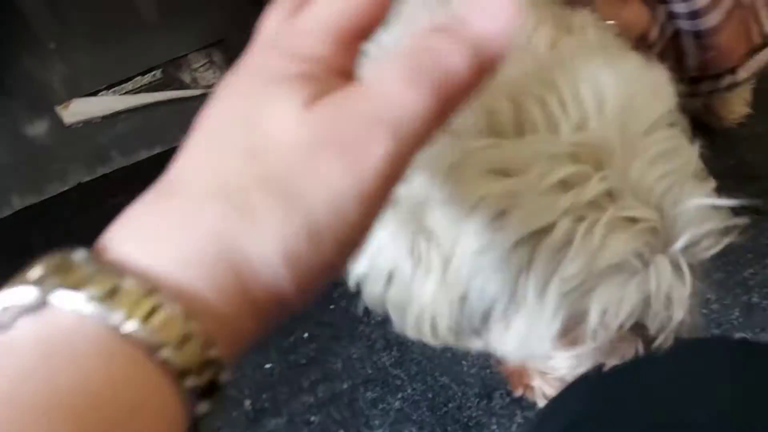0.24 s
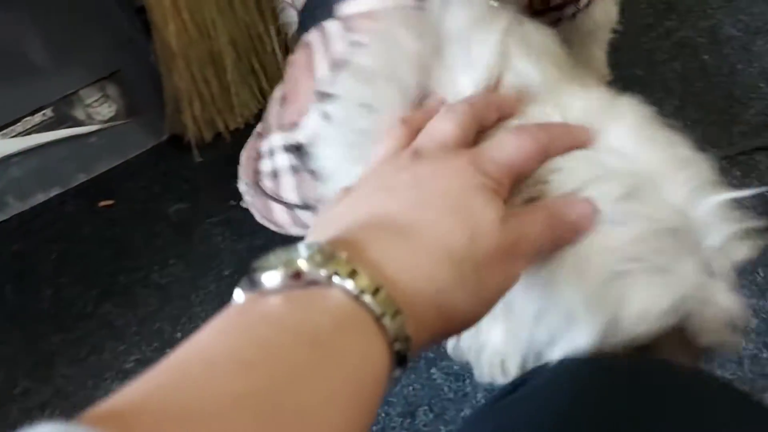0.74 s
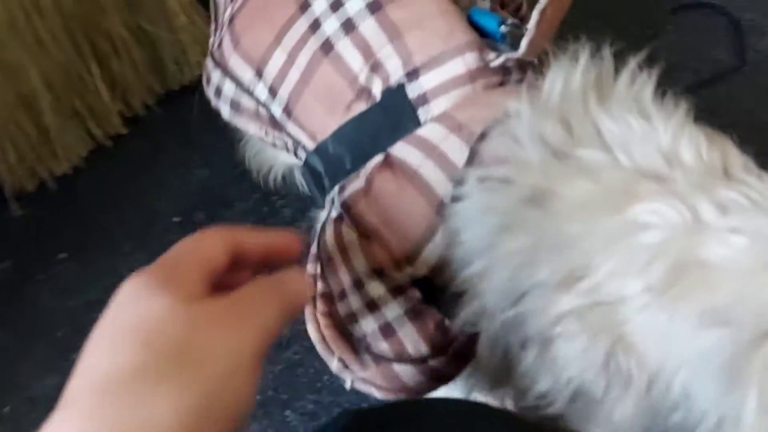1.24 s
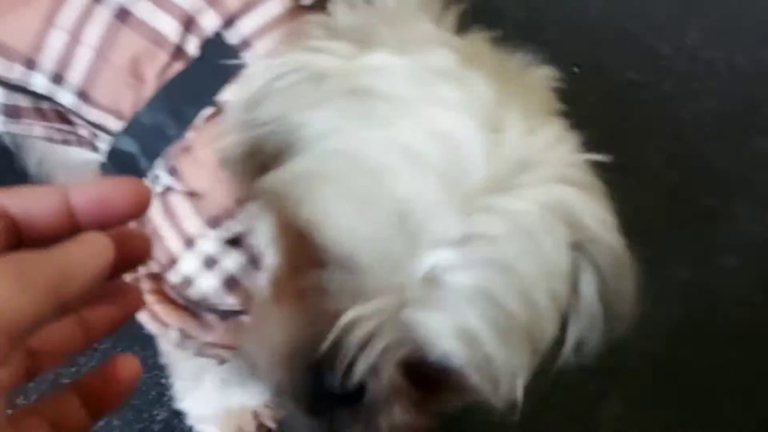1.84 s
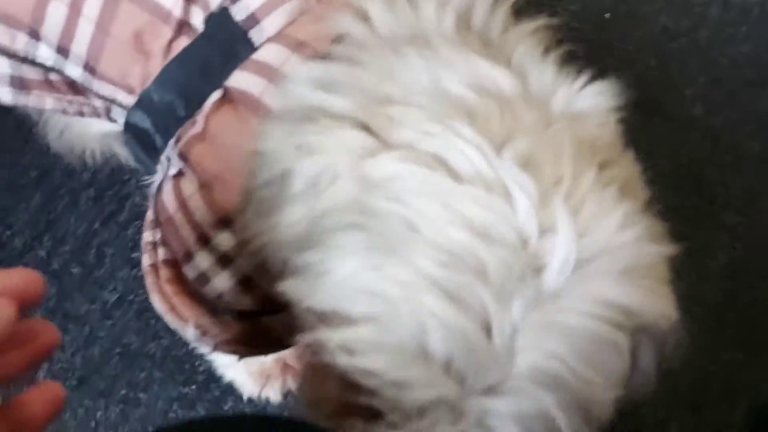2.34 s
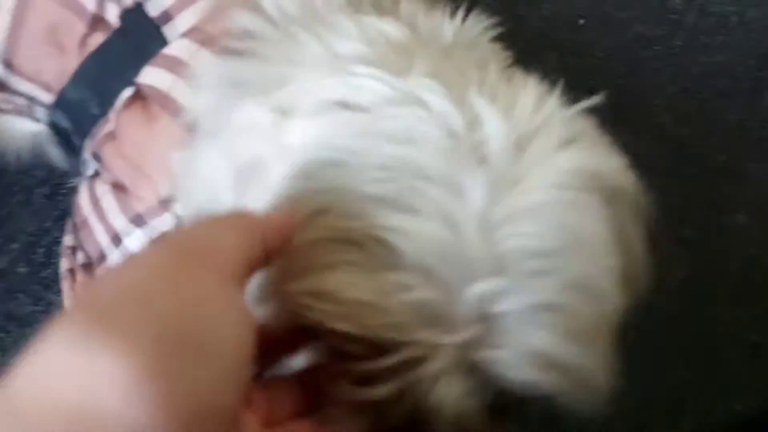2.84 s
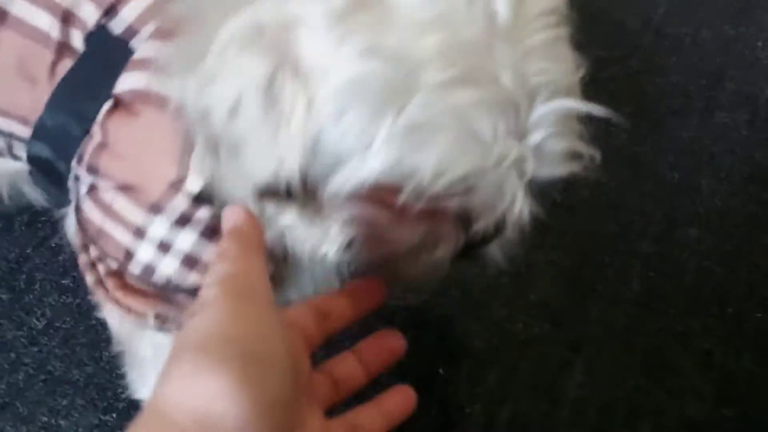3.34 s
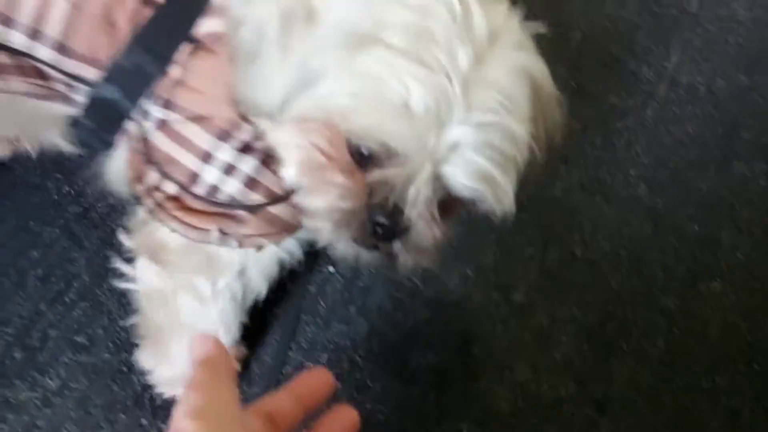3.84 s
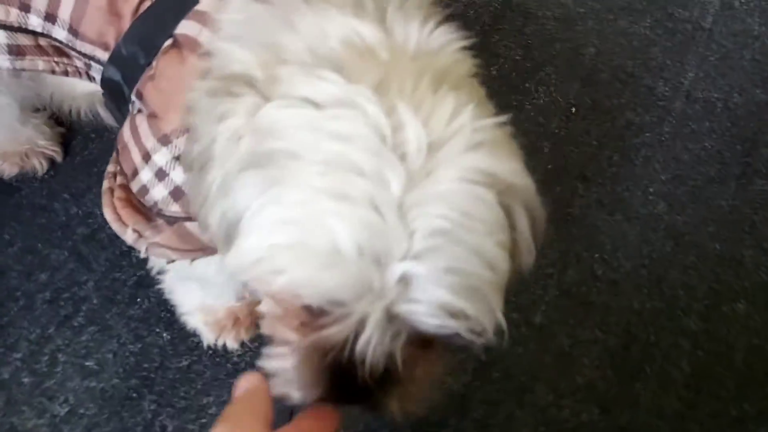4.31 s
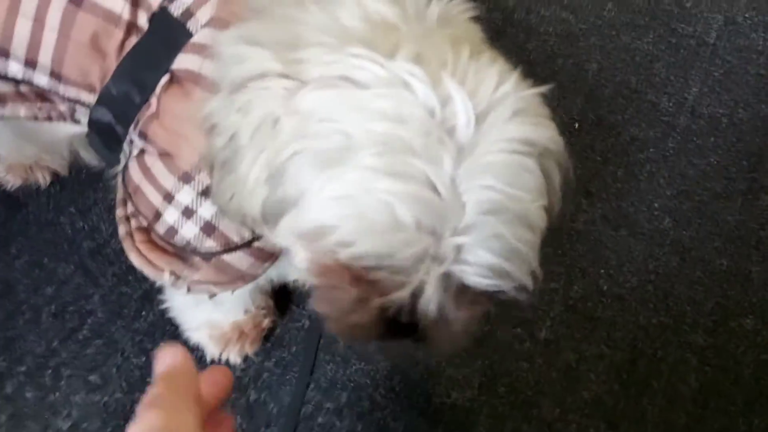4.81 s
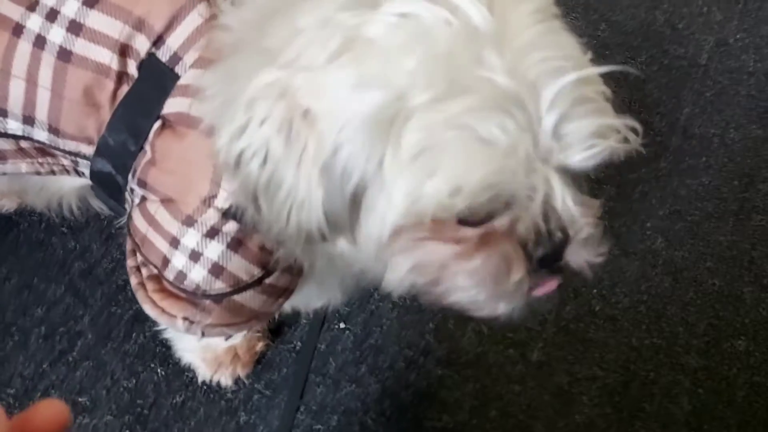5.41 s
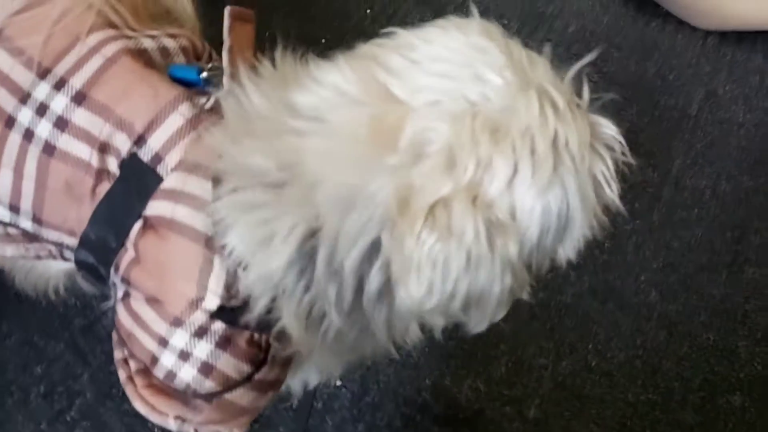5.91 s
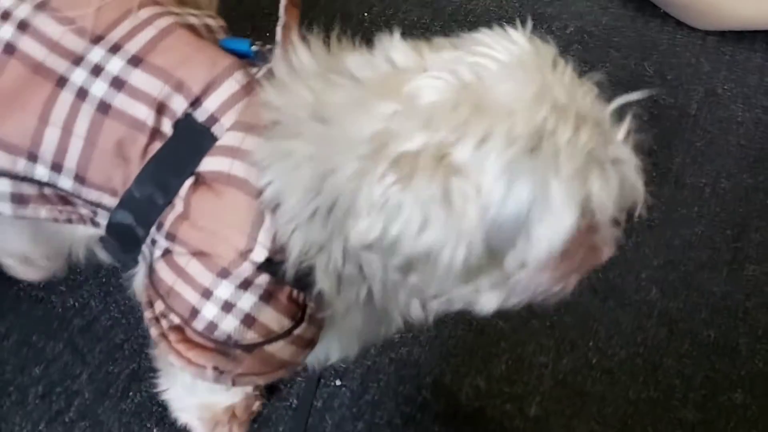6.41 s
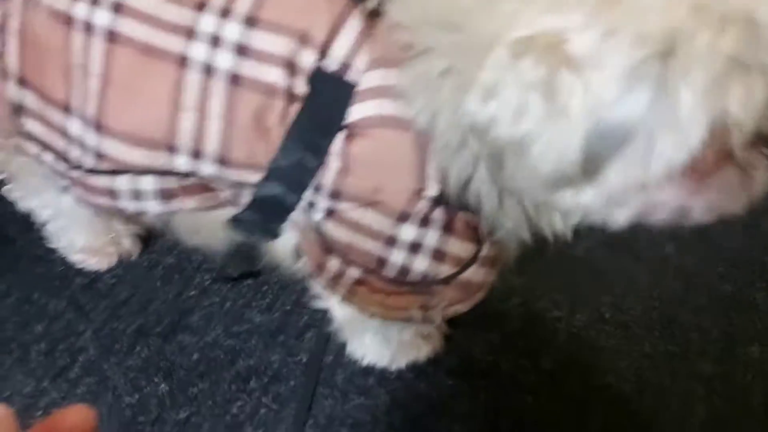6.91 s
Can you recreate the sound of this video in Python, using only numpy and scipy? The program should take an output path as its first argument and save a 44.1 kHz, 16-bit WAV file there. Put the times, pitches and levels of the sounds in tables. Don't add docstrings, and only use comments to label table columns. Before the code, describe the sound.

Over a low electrical hum and airy ventilation, collar pieces clink and rattle, a dog sniffs close by, and something soft thuds and bounces.

```python
import sys
import numpy as np
from scipy import signal
from scipy.fft import rfft, irfft, next_fast_len
from scipy.io import wavfile
from scipy.ndimage import uniform_filter1d

SR = 44100
rng = np.random.default_rng(int(sys.argv[2]) if len(sys.argv) > 2 else 0)


def voltage_ratio(decibels):
    exponent = np.asarray(decibels, float) / 20
    return 10 ** exponent


def dump_mix(stems):
    frames = np.atleast_2d(stems).T
    limited = np.clip(frames, -1, 1)
    pcm = np.round(limited * 32767).astype(np.int16)
    wavfile.write(sys.argv[1], SR, pcm)


N = 315476
M = next_fast_len(N)
T = np.arange(N) / SR
F = np.log(np.fft.rfftfreq(M, 1 / SR) + 1)
PORT_LAG = 18


def on_hz(table, column=1):
    points = np.array(table)
    return np.interp(F, np.log(points[:, 0]), points[:, column])


def colour(x, table):
    return irfft(rfft(x, M) * voltage_ratio(on_hz(table)), M)[..., :N]


def unit(x):
    return x / np.sqrt(np.mean(x ** 2))


def curve(rows, column=1, off=None):
    points = np.array(rows)
    return np.interp(T, points[:, 0], points[:, column], off, off)


def walk(rate):
    hold = int(SR / rate)
    steps = np.repeat(rng.standard_normal(N // 500), hold)[:N]
    return uniform_filter1d(uniform_filter1d(steps, hold), hold)


def resonate(x, hz, width):
    r = np.exp(-np.pi * width / SR)
    return signal.lfilter([1 - r, 0, r - 1], [1, -2 * r * np.cos(2 * np.pi * hz / SR), r * r], x)


def add(out, s, db, hz, t60, rise_s=1e-5, damp_s=9):
    i = int(s * SR)
    t = T[:min(int(t60 * SR), N - i)]
    decay = 1000 ** (-t / t60 - np.maximum(t - damp_s, 0) / 0.041)
    shape = (1 - np.exp(-t / rise_s)) * decay
    out[..., i:i + len(t)] += np.multiply.outer(voltage_ratio(db), np.sin(2 * np.pi * hz * t) * shape)


def bands(x, centres_hz, gains):
    size = next_fast_len(x.shape[-1], True)
    spectrum = rfft(x, size)
    log_hz = np.log(np.fft.rfftfreq(size, 1 / SR) + 1)
    out = 0
    for row, gain in zip(np.eye(len(centres_hz)), gains):
        share = np.interp(log_hz, np.log(centres_hz), row)
        out = out + irfft(spectrum * share, size)[..., :len(gain)] * gain
    return out


# freq_hz, t60_s, port_likeness (1 = same at both)
ROOM = [(59.5, 0.42, .995), (149, 1.1, 0.74), (310, 0.85, 0.98), (620, 0.68, 0.14), (1420, 0.65, -.1),
        (3000, 0.58, 0.16), (6900, 0.37, 0.02), (14000, 0.17, 0)]


def pair():
    like = np.clip(on_hz(ROOM, column=2), -1, 1)
    mid, side = rfft(rng.standard_normal((2, M)))
    opposite = np.array([[1], [-1]])
    both = np.sqrt((1 + like) / 2) * mid + np.sqrt((1 - like) / 2) * side * opposite
    return irfft(both, M)[:, :N]


def room(x, direct_db, wet_db, build_s=0.011, lag=PORT_LAG):
    t = T[:SR]
    fades = [1000 ** (-t / t60) * np.sqrt(2 * np.log(1000) / t60 / SR) for _, t60, _ in ROOM]
    tail = bands(pair()[:, :2 ** 16], np.array(ROOM)[:, 0], fades) * (1 - np.exp(-t / build_s))
    direct = np.array([np.roll(x, int(lag)), x])
    reflections = signal.fftconvolve(x[None], tail, axes=1)[:, :N]
    return voltage_ratio(direct_db) * direct + voltage_ratio(wet_db) * reflections


# time_s, level_db
HUM_LOAD = [
    (0.0, -30.5),
    (1.51, -27.5),
    (2.01, -25.5),
    (2.69, -26.5),
    (3.19, -25),
    (4.6, -26),
    (6.29, -25.5),
    (7.15, -26.5),
]
# centre_s, half_length_s, lift_db
BRUSHES = [
    (.1, .5, -3),
    (1.0, .3, 1),
    (3.07, .3, 7),
    (4.2, .3, 1.5),
    (4.75, .2, -2),
    (5.3, .3, 3.5),
    (6.18, .1, -4),
    (6.45, .2, 2),
    (6.72, .1, -3),
    (7.15, .3, 2),
]
# freq_hz, width_hz, level_db
DUCTS = [(179.2, 15.7, 2), (242, 14, -6), (268.5, 25, -5.5), (302, 15, -2.5), (350.7, 18, -8.5),
         (368.3, 15, -5), (436, 24, -9.5), (520, 21, -11), (611, 14, -17.5), (684, 18, -19), (899, 77, -17),
         (1438, 97, -22.5)]
# freq_hz, level_db
RUMBLE = [(25, -11.5), (45, 0), (65, -9.5), (80, 2.5), (100, -4.5), (140, -9), (180, -7.5), (215, -8),
          (265, -9.5), (320, -10), (375, -10), (450, -15.5), (560, -24.5), (800, -39.5)]
# freq_hz, level_db
AIR = [(400, -9.5), (560, -1), (700, -3.5), (900, 2), (1150, -5), (1450, -0.5), (1800, -5), (2200, -5),
       (2800, -16), (3600, -26.5)]
# freq_hz, level_db
HISS = [(2000, -12), (3000, -0.5), (4500, -3.5), (5600, 3), (6100, 2.5), (6500, 7), (6900, -0.5),
        (8200, -3.5), (11300, -5), (11900, -0.5), (12500, -14.5), (16000, -3)]


def background():
    hum_hz, start_rad, left_db = 120.027, -.9, -4
    hum = np.cos(2 * np.pi * hum_hz * T + start_rad)
    hum = hum + voltage_ratio(-24) * np.sin(2 * np.pi * 179.5 * T)
    port_db = np.array([[left_db], [-left_db]]) / 2
    hum = hum * voltage_ratio(curve(HUM_LOAD) + 3 + 0.56 * walk(5) + port_db)

    flow = pair()
    ducts = unit(sum(voltage_ratio(db) * resonate(flow, hz, width) for hz, width, db in DUCTS))
    rumble = (unit(colour(pair(), RUMBLE)) + voltage_ratio(-5.5) * ducts) * voltage_ratio(-40.3)
    brush_db = sum(db * np.maximum(1 - abs(T - s) / half, 0) for s, half, db in BRUSHES)
    air = unit(colour(pair(), AIR)) * voltage_ratio(-51.5 + .6 * brush_db)
    hiss = unit(colour(pair(), HISS)) * voltage_ratio(-53.5 + brush_db)

    centres_hz = 40 * 2 ** np.arange(0, 9, .75)
    swell = walk(7)
    wander = (voltage_ratio(0.87 * swell + 0.31 * walk(2.37) + 1.18 * walk(11)) for _ in centres_hz)
    return hum + bands(rumble + air + hiss, centres_hz, wander)


# start_s, level_db, pitch_hz, length_cycles
THUD = [
    (6.41, -14, 338, 1.6),
    (6.436, -6, 71, 2.3),
    (6.457, -11.5, 202, 3.2),
    (6.535, -16, 95, 2.0),
    (6.595, -11.5, 92, 1.7),
    (6.715, -18, 85, 3.3),
]
# start_s, level_db, centre_hz, width_hz, t60_s
PUFFS = [
    (6.412, -24.5, 640, 330, 0.14),
    (6.415, -32.5, 1290, 220, 0.13),
    (6.413, -20.5, 296, 154, 0.39),
    (6.415, -23, 184, 60, 0.33),
    (6.455, -31, 386, 320, 0.38),
    (6.56, -29.5, 188, 68, 0.54),
    (6.58, -37.5, 460, 250, 0.28),
    (4.982, -37.5, 800, 700, 0.36),
    (3.2, -45, 1230, 450, 0.12),
]


def thud():
    out, air = np.zeros(N), rng.standard_normal(N)
    for s, db, hz, cycles in THUD:
        add(out, s, db, hz, 3 * cycles / hz, rise_s=0.25 / hz)
    lead = SR // 10
    for s, db, hz, width, t60 in PUFFS:
        i = int(s * SR)
        t = T[:N - i]
        puff = unit(resonate(resonate(air[i - lead:], hz, width), hz, width))[lead:]
        out[i:] += voltage_ratio(db) * (1 - np.exp(-t / 0.0027)) * 1000 ** (-t / t60) * puff
    return out


# peak_s, swell_s, release_s, peak_db, nostril_hz
SNIFFS = [
    (.79, .07, .1, -48, 5670),
    (2.83, .11, .04, -49, 7600),
    (3.224, .055, .036, -49, 7790),
    (5.1, .09, .08, -33.5, 6500),
]
# freq_hz, level_db
SNIFF_COLOUR = [(400, -14), (900, 5.5), (1500, -5), (3000, -2.5), (6000, -7.5), (9000, -6), (13000, -1),
                (16000, -7)]


def sniffs():
    air, out = unit(colour(rng.standard_normal(N), SNIFF_COLOUR)), 0
    swell_db, release_db = -9, -25
    for s, swell, release, db, hz in SNIFFS:
        nose = air + 1.7 * resonate(air, hz, 2700)
        breath = [(s - swell, db + swell_db), (s, db),
                  (s + release / 2, db + release_db / 4), (s + release, db + release_db)]
        effort = voltage_ratio(curve(breath, off=-150) + 1.4 * walk(40))
        out = out + uniform_filter1d(effort, size=SR // 50) * nose
    return out


# start_s, peak_db, pitch_hz, click_db
TICKS = [(1.1408, -46, 6490, -55), (1.2694, -45, 7950, -61), (3.654, -38.5, 7640, -57),
         (3.6855, -37, 7840, -56), (3.6955, -36, 7720, -59), (4.14, -45, 6410, -52),
         (4.1724, -40, 8700, -66), (4.2163, -52, 3060, -61), (4.2284, -36, 7870, -60),
         (4.281, -37, 6600, -38), (4.8534, -50, 3000, -61), (5.7593, -49, 8280, -61),
         (5.8633, -35, 4370, -64), (6.3325, -45, 3700, -44), (6.351, -25, 11800, -33),
         (6.3614, -33, 12400, -48), (6.4054, -52, 3360, -62), (6.8069, -37, 7100, -59),
         (6.8284, -41, 3400, -50), (6.842, -29, 6930, -60), (6.9412, -28, 3900, -29),
         (6.9874, -63, 4920, -57), (6.925, -60, 12000, -50)]


def ticks():
    pan_db, ring_cycles = -4, 16
    out, side_db = np.zeros((2, N)), np.array([pan_db, -pan_db]) / 2
    for s, db, hz, click_db in TICKS:
        add(out, s, db + side_db + 11, hz, ring_cycles / hz, rise_s=0.00015)
        add(out, s, click_db + side_db + 12, 12500, .0008)
    return np.array([np.roll(out[0], int(PORT_LAG)), out[1]])


# freq_hz, level_db, t60_s
TAG = [(1180, -11.5, .6), (2810, 1, 0.6), (5043, -3, 0.49), (5060, 0, 0.26), (7160, -24, 0.48),
       (7780, 5, 0.28), (7790, -10, 0.27), (10860, -13, 0.35), (11700, -14, .3), (12690, -23, .4),
       (12850, -20, .4), (13780, -14, .4), (14340, -17, .4), (15000, -11, 0.22)]
# start_s, level_db, until_fur_damps_s
STRIKES = [
    (5.792, -54.5, 0.054),
    (5.835, -70, .03),
    (5.926, -33.5, 0.119),
]
# start_s, level_db, pitch_hz, t60_s
TINKS = [(.36, -52, 8000, 0.056), (1.841, -39.5, 7860, 0.042), (3.155, -43, 7880, .06),
         (3.385, -51, 4250, .04), (1.67, -51, 2090, .15), (2.395, -45, 2090, .12), (4.904, -46, 2864, .35),
         (4.904, -45, 4700, .2), (5.075, -47, 2900, .45), (7.02, -53, 5290, 0.37), (6.525, -49, 14500, .06),
         (1.355, -42, 1500, 0.048), (4.78, -51, 3100, .05)]


def clinks():
    out = np.zeros(N)
    for s, blow_db, damp_s in STRIKES:
        for hz, db, t60 in TAG:
            add(out, s, blow_db + db, hz, t60, rise_s=.0006, damp_s=damp_s)
    for s, db, hz, t60 in TINKS:
        add(out, s, db, hz, t60, rise_s=0.0014)
    return out


# start_s, attack_s, length_s, peak_db, fall_db (by the end)
SHAKES = [
    (1.62, .014, .14, -43, 20),
    (2.375, .016, .185, -33.5, 10),
    (4.306, .022, .212, -27, 12),
    (5.378, .004, .182, -31, 10),
    (4.9, .003, .06, -22, 40),
    (.268, .008, .042, -36, 30),
    (7.015, .006, .13, -48, 22),
    (5.922, .008, .118, -39, 15),
]
CLATTER_DB = [-18.5, -19, -14.5, -10, -25.5, -26, -22, -24]
# freq_hz, level_db
CLATTER = [(500, -3), (1500, -9), (2400, -6.5), (3200, -10), (4200, -3.5), (5000, -8), (6200, -3.5),
           (9000, -1), (13000, 2.5), (16000, -5)]
# freq_hz, width_hz, level_db
LOOP = [(4075, 100, -7.5), (7870, 48, -1), (8050, 50, -9)]
DISC = [(2096, 34, -8), (6640, 27, -10), (11230, 57, -2), (12840, 50, -3), (13700, 40, -9),
        (15400, 43, -11)]
CLASP = [(1440, 24.4, -20), (2590, 45, -4.5), (5860, 55, 0.5), (6400, 40, -9), (10280, 140, -4),
         (12110, 49, -2), (13480, 70, -8), (14200, 30, -9), (14560, 40, -7.5), (14900, 35, -6)]
# loop_db, disc_db, clasp_db
TOUCH = [
    (3, -3, -5),
    (0, 0, -5),
    (-1, -7, 0),
    (-3, -15, -3),
]
# freq_hz, width_hz, level_db
BUCKLE = [(2200, 180, -17), (2870, 32, -12), (3500, 120, -24), (5110, 40, -11), (7870, 90, 1),
          (8920, 140, -28), (9500, 39, -28), (11100, 41, -20), (13000, 64, -21), (13800, 48, -5),
          (14800, 58, -10), (5850, 200, -22)]
LINK = [(10600, 250, -2), (12900, 45, -17), (14200, 53, 6), (14700, 24, -2), (14900, 46, -8)]
STUD = [(5220, 63, 0), (7920, 180, -19), (10300, 62, -37), (10600, 34, -20), (13600, 31, 1)]
TAG_EDGE = [(2850, 140, -8), (5030, 130, 4), (7100, 750, -18), (7700, 110, 2), (13000, 1000, -17)]


def rattle():
    contacts_per_s, spread_db = 1100, 0.5
    chance = rng.random((2, N))
    hits = chance[0] < contacts_per_s / SR
    force = voltage_ratio(np.minimum(-spread_db * np.log(chance[1]), 9))
    contacts = hits * force * rng.choice([-1, 1], N)

    links_hz = rng.uniform(603, 15800, size=170)
    impulse = 1. * (T[:SR // 8] == 0)
    ring = sum(resonate(impulse, hz, 40) for hz in links_hz)
    links = signal.fftconvolve(contacts, ring)[:N] + 0.26 * contacts
    clatter = colour(links, CLATTER)

    struck = []
    for touches in TOUCH:
        pieces = zip((LOOP, DISC, CLASP), touches)
        struck.append([(hz, width, db + touch_db) for piece, touch_db in pieces for hz, width, db in piece])
    struck += [BUCKLE, LINK, STUD, TAG_EDGE]

    out = np.zeros(N)
    for (s, attack, length, peak_db, fall), rings, clatter_db in zip(SHAKES, struck, CLATTER_DB):
        span = slice(int(s * SR) - 100, int((s + length) * SR) + SR // 4)
        hold = .03 * (fall < 15)
        path = [(s, peak_db - 17), (s + attack, peak_db),
                (s + attack + hold, peak_db), (s + length, peak_db - fall)]
        push = voltage_ratio(curve(path, off=-150)[span])

        def metal(drive):
            ringing = sum(voltage_ratio(db) * resonate(drive * contacts[span], hz, width) for hz, width, db in rings)
            return voltage_ratio(clatter_db) * drive * clatter[span] + ringing

        out[span] += metal(push) / np.std(metal(1))
    return out


def scene():
    metal = room(rattle(), -4.5, 7.6) + room(clinks(), 2.9, 4)
    landing = room(thud(), -0.89, -1.9, lag=0)
    breath = room(sniffs(), 1.8, 2.6, build_s=0.0016)
    return metal + landing + breath + ticks() + background()


def top_cut(x):
    return signal.sosfilt(signal.butter(12, 15850, fs=SR, output="sos"), x)


# freq_hz, level_db
LEFT_PORT = [(25, -4), (60, 0), (400, 0), (800, 0.5), (2500, -2.5), (4500, -6), (8000, -14), (10000, -7.5),
             (12000, -8), (15300, -17.5)]
RIGHT_PORT = [(25, -14), (60, 0), (7000, -0.5), (8300, 4.5), (9300, -12), (10300, -11), (11500, -2.5),
              (13000, -1), (15300, -3.5)]
# freq_hz, level_db
TOP_CUT = [(15250, 0), (15650, -7), (15850, -50)]


def record(dry):
    ports = np.array([colour(dry[0], LEFT_PORT), colour(dry[1], RIGHT_PORT)])
    mix = colour(ports, TOP_CUT)
    return top_cut(mix)


dry = scene()
out = record(dry)
dump_mix(out)
```